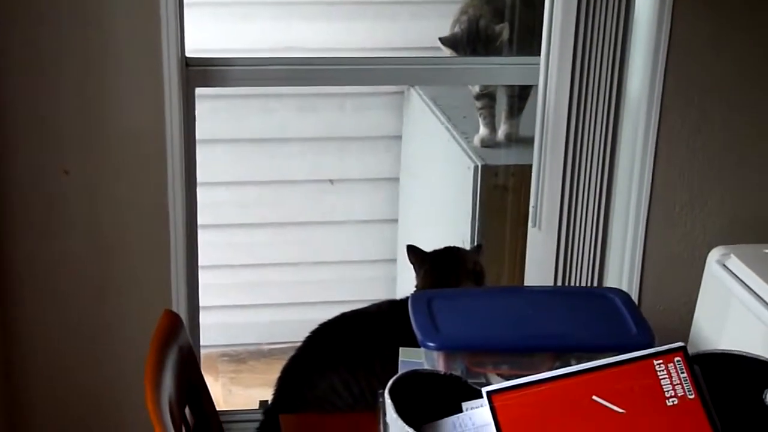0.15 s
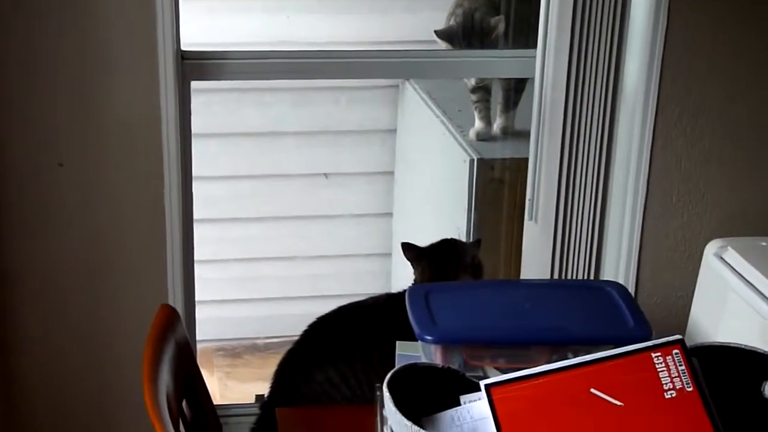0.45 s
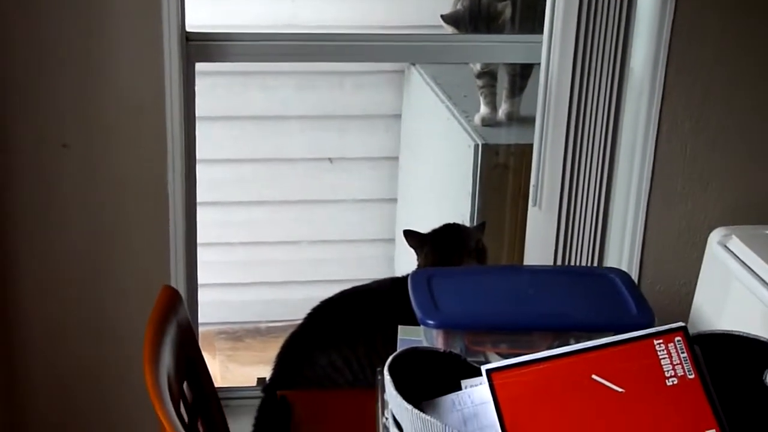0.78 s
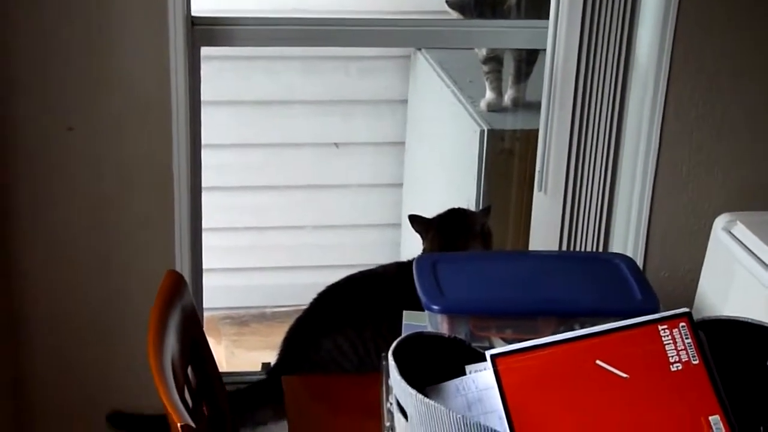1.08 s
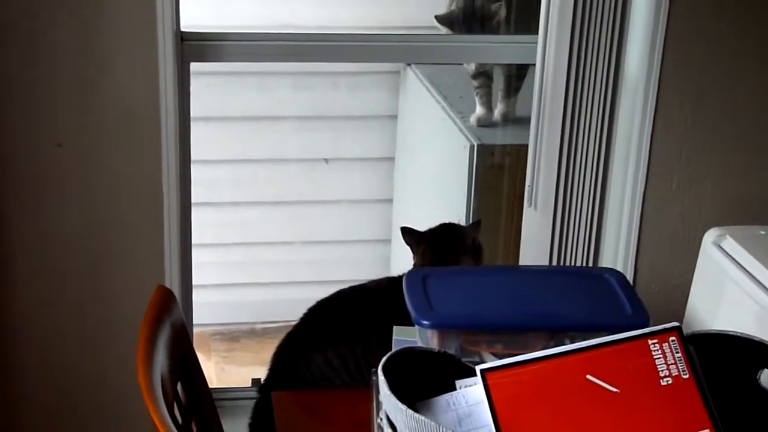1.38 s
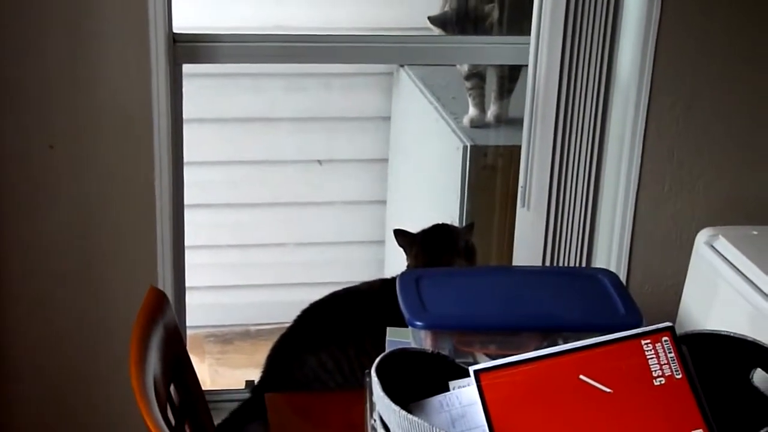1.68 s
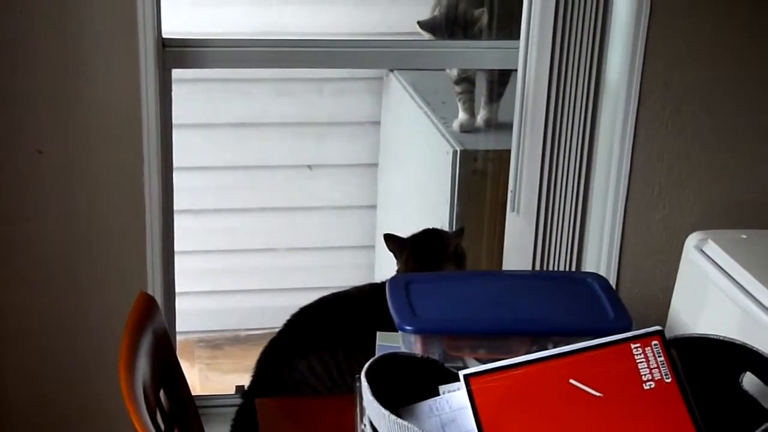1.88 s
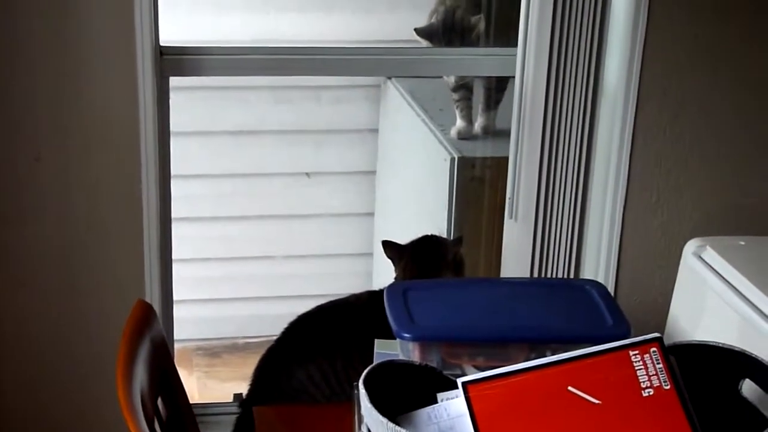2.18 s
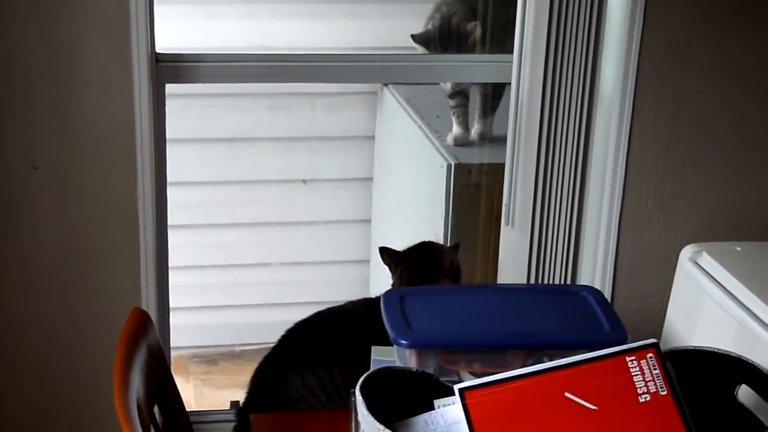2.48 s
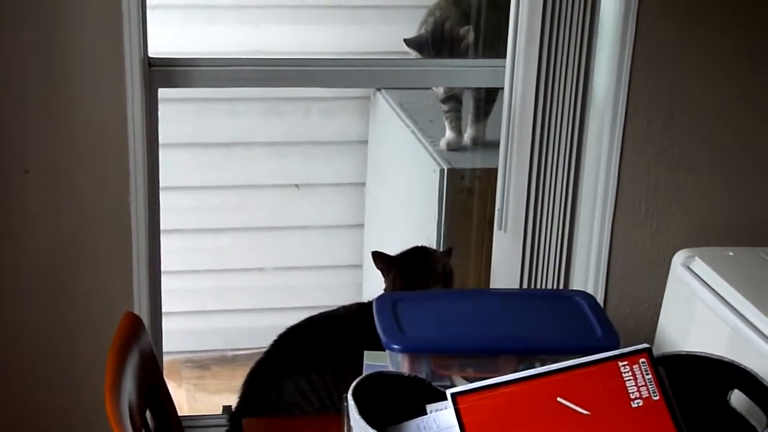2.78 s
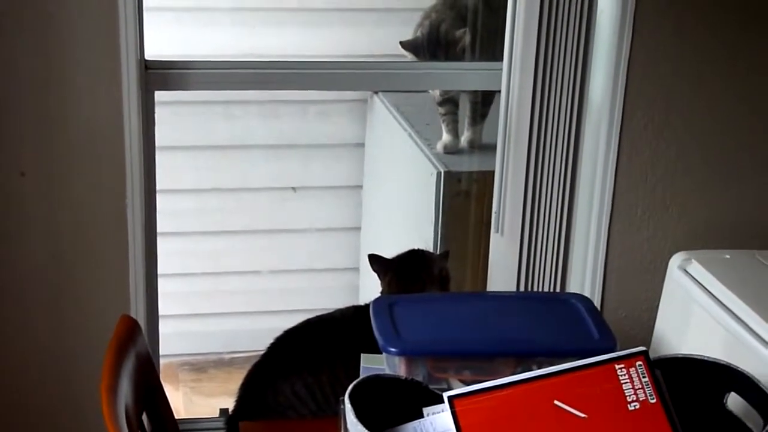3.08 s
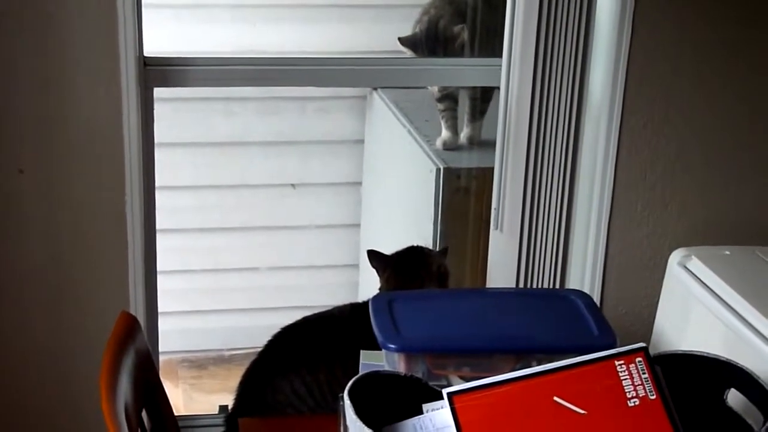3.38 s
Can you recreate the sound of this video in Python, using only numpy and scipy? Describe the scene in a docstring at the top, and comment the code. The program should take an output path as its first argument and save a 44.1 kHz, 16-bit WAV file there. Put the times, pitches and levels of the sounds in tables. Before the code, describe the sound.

A cat starts a long yowl almost at once, rising, holding with small unsteady breaks, then sinking slightly and stopping near the end; small room, fairly close stereo microphone, faint low hum underneath.

```python
"""A low room hum runs throughout: uneven filtered noise plus four steady sines.
At 0.2 s a cat starts one long yowl: four strong harmonics, weaker overtones, air and noise bursts, in a room.
Its pitch climbs, holds and sinks; weight shifts among the harmonics, and short breaks turn it unsteady.
At times the folds beat strong-weak, adding half harmonics. Gain control ducks voice and hum during the
call; the yowl stops at about 3.2 s and the hum recovers."""
import sys
import numpy as np
from scipy import signal
from scipy.fft import rfft, irfft
from scipy.io import wavfile
from scipy.ndimage import uniform_filter1d

SR = 44100
rng = np.random.default_rng(int(sys.argv[2]) if len(sys.argv) > 2 else 0)


def unload_wav(signal):
    """Save mono or channel-first audio to the path in sys.argv[1] as 16-bit WAV at rate SR, clipped to [-1, 1]."""
    wavfile.write(
        sys.argv[1],
        SR,
        np.round(np.clip(np.atleast_2d(signal).T, -1, 1) * 32767).astype(np.int16),
    )


N = 154350
TIME = np.arange(N) / SR


def amp(db):
    """Amplitude factor of a level in dB."""
    return 10 ** (np.asarray(db) / 20)


def unit(x):
    """Scales to rms 1."""
    return x / np.sqrt(np.mean(x ** 2) + 1e-20)


def curve(rows, axis=1):
    """One table column, interpolated over time."""
    rows = np.array(rows)
    return np.interp(TIME, rows[:, 0], rows[:, axis])


def read(points, hz, axis=1):
    """One spectrum table column, interpolated over log frequency."""
    columns = np.transpose(points)
    return np.interp(np.log(hz + 1), np.log(columns[0]), columns[axis])


def shaped(x, gain):
    """Filters by a gain given as a function of frequency."""
    freqs_hz = np.fft.rfftfreq(x.shape[-1], 1 / SR)
    return irfft(rfft(x) * gain(freqs_hz), x.shape[-1])


def swell(start_s, length_s):
    """Half-sine rise and fall, peak 1."""
    return np.sin(np.pi * np.clip((TIME - start_s) / length_s, 0, 1))


def wobble(rate_hz):
    """Random unsteadiness around a rate, rms 1."""
    def band(f):
        return f / rate_hz / (1 + (f / rate_hz) ** 5)
    return unit(shaped(rng.standard_normal(N), band))


# Left-right correlation of diffuse sound: (frequency [Hz], correlation [0-1])
DIFFUSE_CORRELATION = [(30, 1), (600, 1), (1200, 0.85), (2200, 0.4), (4500, 0), (9000, .05)]


def diffuse_pair(a, b):
    """Two unrelated signals as two close microphones hear a diffuse field: mid and side set the correlation."""
    def correlation(f):
        return np.clip(read(DIFFUSE_CORRELATION, f), 0, .998)
    mid = shaped(a, lambda f: np.sqrt((1 + correlation(f)) / 2))
    side = shaped(b, lambda f: np.sqrt((1 - correlation(f)) / 2))
    return np.array([mid + side, mid - side])


# Room noise spectrum, relative: (frequency [Hz], density [dB per Hz])
FLOOR_SPECTRUM = [(15, -75.5), (25, -21), (96, -10.5), (215, -6), (297, -6.5), (340, -13.5), (495, -13.5),
                  (537, -22), (582, -16), (919, -24.5), (1080, -22), (1170, -26), (2120, -33.5),
                  (2560, -61), (3000, -44.5), (13200, -50), (15500, -53)]
# Steady hum tones: (frequency [Hz], rms level [dB])
HUM_TONES = [(119, -49.5), (159, -49.5), (240, -49.5), (298, -44.5)]
FLOOR_DB, LUMP_DB_RMS, LUMP_HZ = -34.5, 1.4, 7


def background():
    """Low room noise, slowly uneven in level, with steady hum tones."""
    white = rng.standard_normal((2, N))
    noise = unit(shaped(diffuse_pair(*white), lambda f: amp(read(FLOOR_SPECTRUM, f))))
    hum = np.zeros(N)
    for hz, db in HUM_TONES:
        hum += amp(db) * np.sqrt(2) * np.sin(2 * np.pi * (hz * TIME + rng.random()))
    return amp(FLOOR_DB + LUMP_DB_RMS * wobble(LUMP_HZ)) * noise + hum


# Breaks, where pitch and level turn unsteady: (start [s], length [s])
VOICE_BREAKS = [(0.404, 0.38), (1.134, 0.15), (1.398, 0.077), (1.816, 0.1), (2.89, 0.07), (3.15, 0.085)]


def unsteady():
    """Rises from 0 to 1 and falls back during each break."""
    return sum(swell(start_s, length_s) for start_s, length_s in VOICE_BREAKS)


# Yowl pitch before jitter: (time [s], pitch [Hz])
YOWL_PITCH = [(0.205, 418), (0.229, 466.7), (0.251, 469.4), (0.285, 502), (0.335, 508.2), (0.365, 501),
              (0.415, 505.8), (0.515, 537.6), (0.565, 536.7), (0.665, 558.2), (0.725, 556.3),
              (0.755, 569.9), (0.855, 579), (1.015, 586.7), (1.095, 583.8), (1.155, 564), (1.295, 591.8),
              (1.425, 566.8), (1.595, 582.6), (1.745, 578.2), (1.855, 555), (1.885, 574.4), (2.085, 566.3),
              (2.125, 560.6), (2.31, 546.4), (2.53, 550), (2.575, 554.8), (2.635, 539.7), (2.795, 530.8),
              (2.895, 537.8), (2.935, 515.4), (3.105, 517.9), (3.145, 534), (3.215, 540.7)]
JITTER, BREAK_JITTER, JITTER_HZ = .0015, .0067, 55  # rms fraction of pitch; rate
START_S, ATTACK_S, RELEASE_START_S, RELEASE_S = 0.2016, 0.0096, 3.205, 0.07


def folds():
    """Vocal folds: jittered pitch, its running phase, and the on-off envelope."""
    jitter = (JITTER + BREAK_JITTER * unsteady()) * wobble(JITTER_HZ)
    hz = curve(YOWL_PITCH) * (1 + jitter)
    phase = 2 * np.pi * np.cumsum(hz) / SR
    attack = np.clip((TIME - START_S) / ATTACK_S, 0, 1)
    release = np.clip(1 - (TIME - RELEASE_START_S) / RELEASE_S, 0, 1)
    return hz, phase, attack * release


# Random level flutter of voice harmonics
FLUTTER_RATE_HZ = 28
# Harmonics 1-4 before flutter and VOICE_DB: (time [s], level [dB])
HARMONIC_1 = [(0.205, -55), (0.295, -45.5), (0.375, -52.5), (0.635, -31.5), (0.755, -39), (1.035, -33.5),
              (1.145, -36.5), (1.345, -28.5), (1.465, -37.5), (2.605, -32), (2.665, -38.5), (3.165, -38),
              (3.205, -25), (3.222, -53)]
HARMONIC_2 = [(0.214, -38.5), (0.228, -50), (0.265, -36), (0.385, -51.5), (0.556, -19.5), (0.677, -31),
              (0.725, -11.5), (0.774, -26.5), (1.156, -18.5), (1.175, -11), (1.224, -30), (1.254, -21),
              (1.425, -12.5), (1.505, -21), (1.524, -36), (1.545, -22), (1.785, -21.5), (1.815, -13),
              (1.83, -28), (1.852, -13), (1.935, -21), (2.025, -16), (2.125, -21.5), (2.155, -16),
              (2.245, -22), (2.313, -13.5), (2.475, -14.5), (2.575, -18.5), (2.624, -13.5), (2.797, -21.5),
              (2.825, -15), (2.895, -16), (2.955, -29.5), (2.974, -20.5), (3.135, -23.5), (3.155, -14),
              (3.175, -22.5), (3.197, -12.5), (3.222, -31.5)]
HARMONIC_3 = [(0.214, -59.5), (0.233, -30.5), (0.259, -23.5), (0.285, -18), (0.414, -12.5), (0.445, -32.5),
              (0.556, -19.5), (0.585, -32), (0.665, -33), (0.765, -15), (0.875, -17), (1.005, -28.5),
              (1.031, -41.5), (1.055, -27), (1.115, -21.5), (1.155, -33), (1.345, -38.5), (1.375, -33),
              (1.505, -21), (1.565, -19.5), (1.995, -32.5), (2.165, -26), (2.735, -29), (2.765, -43),
              (2.895, -27.5), (2.975, -37.5), (3.135, -34), (3.2, -33.5), (3.222, -45)]
HARMONIC_4 = [(0.205, -64), (0.285, -32.5), (0.535, -20.5), (0.575, -32), (0.675, -31), (0.695, -41),
              (0.755, -29.5), (0.945, -30), (0.985, -22), (1.125, -27.5), (1.305, -38.5), (1.404, -26.5),
              (1.425, -31.5), (1.485, -30), (1.785, -27), (1.835, -35.5), (2.065, -37.5), (2.295, -30),
              (2.516, -26), (2.545, -36.5), (2.693, -22.5), (2.745, -31.5), (2.765, -31), (2.835, -28),
              (3.163, -29.5), (3.215, -45.5)]
FLUTTER_DB_RMS = [.5, .6, .8, 1.1]  # harmonics 1-4, outside breaks
BREAK_FLUTTER_DB_RMS = 2.6  # most that a break adds
FIRM_DB = -19  # louder harmonics gain no break flutter


def core(phase):
    """Four low harmonics of the folds; in breaks, weak ones among harmonics 2-4 flutter more."""
    out = np.zeros(N)
    for k, rows in enumerate([HARMONIC_1, HARMONIC_2, HARMONIC_3, HARMONIC_4]):
        db = curve(rows)
        weakness = np.clip((FIRM_DB - db) / 10, 0, 1) * (k > 0)
        flutter_db = FLUTTER_DB_RMS[k] + BREAK_FLUTTER_DB_RMS * unsteady() * weakness
        level = amp(db + flutter_db * wobble(FLUTTER_RATE_HZ))
        out += level * np.sqrt(2) * np.sin((k + 1) * phase)
    return out


# Overtone centres: (frequency [Hz])
OVERTONE_CENTRES_HZ = [2650, 3420, 4610, 6400, 7760]
# Overtone levels before colour, flutter and OVERTONE_DB: (time [s], level at each of five centres [dB])
OVERTONE_LEVELS = [(0.22, -65.5, -81.5, -75, -71, -83), (0.29, -43, -63, -54.5, -57, -65.5),
                   (0.61, -71, -52.5, -56, -61.5, -63.5), (0.78, -33.5, -61, -47.5, -55, -62.5),
                   (0.95, -56.5, -47, -65.5, -52, -63.5), (1.07, -65.5, -50, -62, -47.5, -54.5),
                   (1.28, -68, -51, -54.5, -62.5, -71.5), (1.47, -61, -51, -56.5, -49, -60),
                   (2.1, -66, -58, -57.5, -63.5, -74), (2.21, -56.5, -54.5, -41, -46, -66),
                   (2.5, -58, -61, -43.5, -53.5, -71.5), (2.66, -76, -54, -52.5, -58, -66.5),
                   (3.07, -69.5, -47.5, -70, -59, -75.5), (3.2, -79, -57.5, -61, -54, -65)]
# Gain over frequency: (frequency [Hz], gain [dB])
OVERTONE_COLOUR = [(2150, 15), (2480, 0), (3200, 0), (3750, -3), (4400, 0), (4600, -13), (4950, -20),
                   (5220, -4), (5500, -11), (5740, -2), (6050, 0), (6350, -2), (6600, -17), (7150, -10),
                   (7480, -2), (7750, -11), (8120, 0), (8900, -15), (10200, -3), (10800, -13), (14500, -18)]
# Overtones that stand out or hang back: {harmonic number: gain [dB]}
OVERTONE_EMPHASIS = {11: 1, 12: -7}
DRIFT_DB_RMS, DRIFT_HZ, EDGE_FLUTTER_DB_RMS = 1.5, 5, 2.8


def overtones(hz, phase):
    """Harmonics 5-25, weak and each fluttering on its own, giving the yowl its edge."""
    centres = range(len(OVERTONE_CENTRES_HZ))
    levels = [curve(OVERTONE_LEVELS, axis=j + 1) for j in centres]
    shares = np.eye(len(levels))  # interpolates between centres
    out = np.zeros(N)
    for k in range(5, 26):
        db = sum(levels[j] * np.interp(k * hz, OVERTONE_CENTRES_HZ, shares[j]) for j in centres)
        db += DRIFT_DB_RMS * wobble(DRIFT_HZ) + EDGE_FLUTTER_DB_RMS * wobble(FLUTTER_RATE_HZ)
        db += OVERTONE_EMPHASIS.get(k, 0) + read(OVERTONE_COLOUR, k * hz)
        out += amp(db) * np.sqrt(2) * np.sin(k * phase)
    return out


# Breath spectrum, relative: (frequency [Hz], density [dB per Hz])
AIR_SPECTRUM = [(300, -6.5), (600, -5), (1100, -8.5), (2200, -2), (2700, -20.5), (4100, -11), (4800, -22.5),
                (6100, -11), (8000, -27), (10000, -19.5), (12500, -24), (14300, -18.5), (15500, -26)]
# Short noise bursts before OVERTONE_DB: rasps at the voice's start, catches and end, a soft low thump at 1.0 s:
# (start [s], length [s], peak level [dB], centre [Hz], half-gain half-width [Hz])
NOISE_BURSTS = [(0.214, 0.12, -39.5, 1546, 520), (0.204, 0.19, -58, 5700, 690),
                (0.67, 0.065, -39, 1310, 600), (1.009, 0.037, -31, 800, 796.5),
                (1.276, 0.14, -40, 1010, 453), (3.186, .07, -33, 920, 170)]
AIR_DB = -51.5  # before OVERTONE_DB


def air_and_bursts(phase, gate):
    """Air puffed through the folds each cycle, with short noise bursts: rasps and one soft low thump."""
    breath = unit(shaped(rng.standard_normal(N), lambda f: amp(read(AIR_SPECTRUM, f))))
    air = amp(AIR_DB) * gate * breath
    for start_s, length_s, db, centre_hz, width_hz in NOISE_BURSTS:
        noise = shaped(rng.standard_normal(N), lambda f: 1 / (1 + ((f - centre_hz) / width_hz) ** 2))
        air += amp(db) * swell(start_s, length_s) * unit(noise)
    return air * (1 + 0.24 * np.cos(phase))


# Strong-weak stretches before VOICE_DB: (start [s], length [s], peak level [dB], centre [Hz])
DOUBLING_STRETCHES = [(.315, .13, -40, 1780), (0.977, 0.22, -45, 1486), (1.43, 0.38, -51, 1460)]
DOUBLING_HALF_WIDTH_HZ = 460


def doubling(hz, phase):
    """Half harmonics of strong-weak fold beats, strongest near the mouth resonance."""
    out = np.zeros(N)
    for start_s, length_s, db, centre_hz in DOUBLING_STRETCHES:
        level = amp(db) * swell(start_s, length_s)
        for k in np.arange(2, 8) + .5:
            offset = (k * hz - centre_hz) / DOUBLING_HALF_WIDTH_HZ
            out += level * np.sqrt(2) * np.sin(k * phase) / np.hypot(1, offset ** 2)
    return out


# Room decay: (frequency [Hz], t60 [s])
ROOM_DECAY = [(300, .45), (1100, .33), (2200, .3), (4000, .2), (14000, .12)]


def room(x):
    """Dense noise reflections from 4 ms on, each band decaying at its own rate."""
    taps = diffuse_pair(*rng.standard_normal((2, SR))) * (TIME[:SR] > .004)
    hz, t, bands = signal.stft(taps, SR, nperseg=256)
    decay = amp(-60 * t / read(ROOM_DECAY, hz)[:, None])
    tail = signal.istft(bands * decay, SR, nperseg=256)[1]
    return signal.fftconvolve(x[None], tail / np.linalg.norm(tail[0]), axes=1)[:, :N]


# Voice at two microphones, shaped by room interference:
# (frequency [Hz], left minus right [dB], left lead [rad])
MICROPHONE_DIFFERENCE = [(700, 0, 0), (1036, -.4, .25), (1150, 1, -.05), (1510, .7, .15), (1650, 1.8, 0),
                         (1740, 6, -.1), (2015, -1.5, .5), (2075, -3.5, -.2), (2145, 4.5, .5),
                         (2240, 6.5, 1.4), (2345, 4, .9), (3500, 1, .2)]
# Voice sent to the room: (frequency [Hz], gain [dB])
ROOM_SEND = [(550, -19), (1100, -16.5), (1700, -13), (2250, -9), (3500, -5), (7000, -2), (11000, 6)]
VOICE_DB, OVERTONE_DB = 8, 4.5


def cat():
    """The yowl at two microphones, left-right level and phase shaped by room interference, plus the room's tail."""
    hz, phase, gate = folds()
    low = amp(VOICE_DB) * gate * (core(phase) + doubling(hz, phase))
    high = amp(OVERTONE_DB) * (gate * overtones(hz, phase) + air_and_bursts(phase, gate))
    voice = low + high

    def right_gain(f):
        lag = np.exp(-1j * read(MICROPHONE_DIFFERENCE, f, axis=2))
        return amp(-read(MICROPHONE_DIFFERENCE, f) / 2) * lag
    left = shaped(voice, lambda f: amp(read(MICROPHONE_DIFFERENCE, f) / 2))
    right = shaped(voice, right_gain)
    return np.array([left, right]) + room(shaped(voice, lambda f: amp(read(ROOM_SEND, f))))


def scene():
    """The cat over the room's background."""
    return cat() + background()


THRESHOLD_DB, MAX_CUT_DB, DUCK_S = -24.5, 8.5, 0.092
EDGE_HZ = 15550


def record(dry):
    """Gain control cuts level above a threshold, smoothed and limited; then a low-pass."""
    power = uniform_filter1d((dry ** 2).mean(0), size=900)
    power_db = 10 * np.log10(abs(power) + 1e-12)
    wanted_cut_db = np.clip(power_db - THRESHOLD_DB, 0, MAX_CUT_DB)
    r = np.exp(-1 / (DUCK_S * SR))
    cut_db = signal.lfilter([1 - r], [1, -r], wanted_cut_db)
    low_pass = signal.firwin(511, EDGE_HZ, window=("kaiser", 9), fs=SR)
    return signal.oaconvolve(dry * amp(-cut_db), low_pass[None], "same")


dry = scene()
out = record(dry)
unload_wav(out)
```